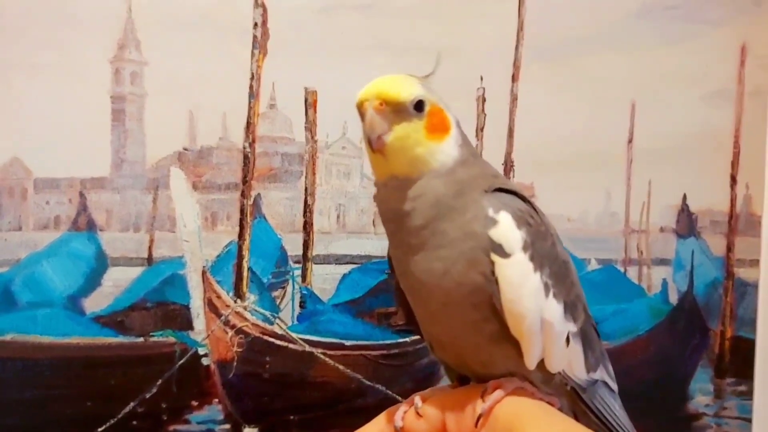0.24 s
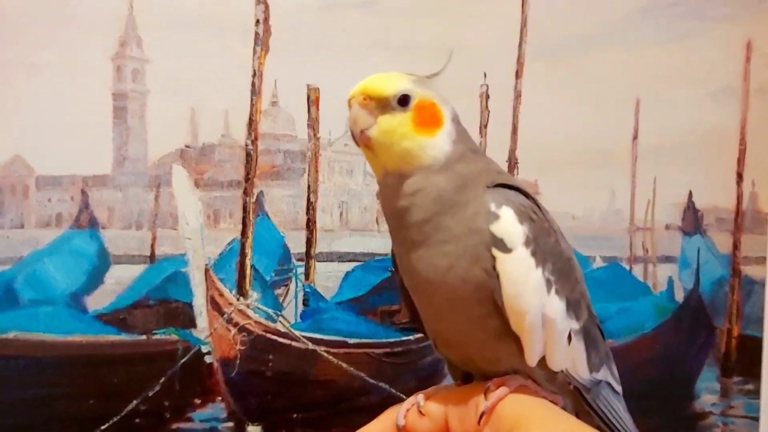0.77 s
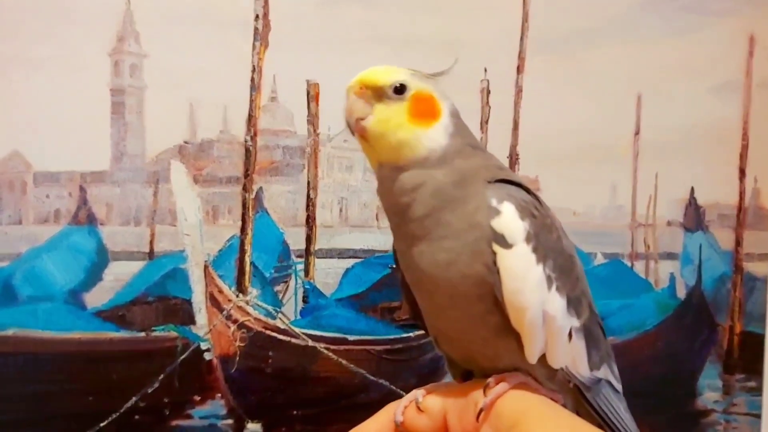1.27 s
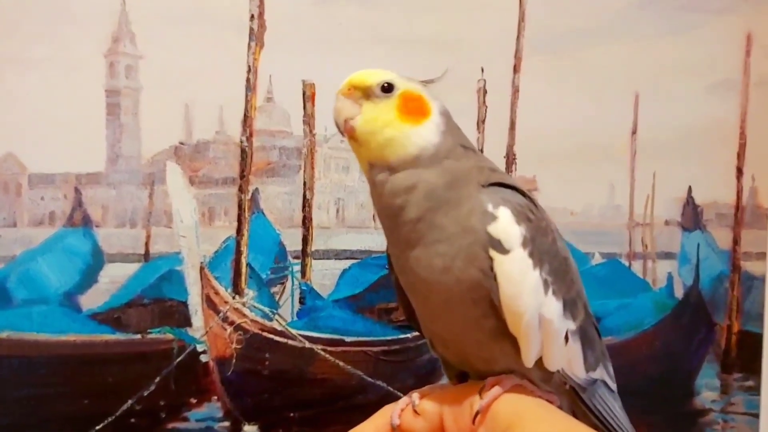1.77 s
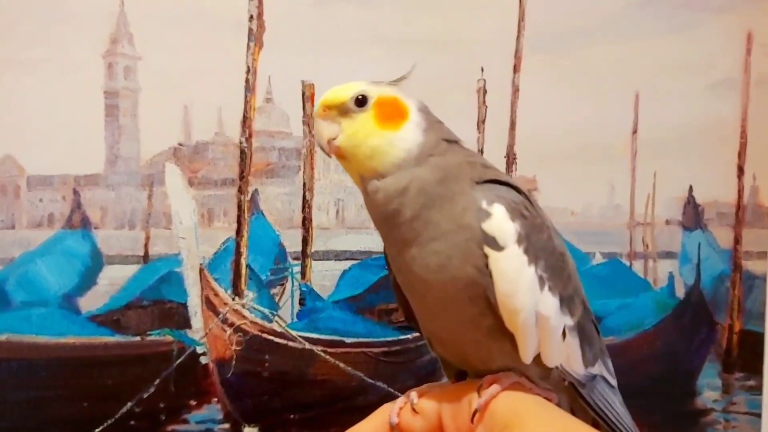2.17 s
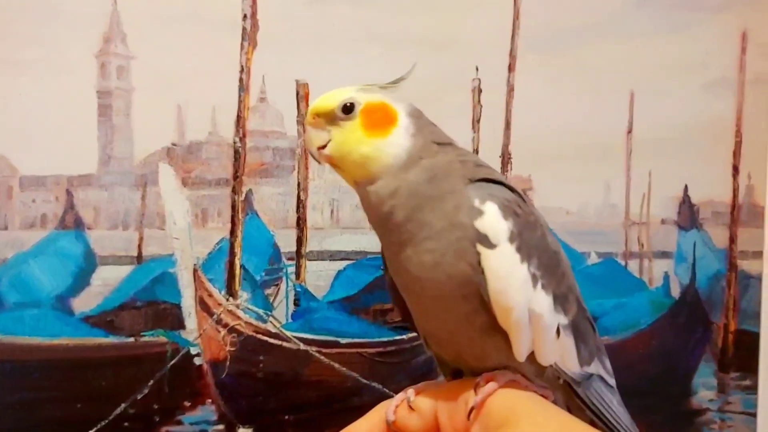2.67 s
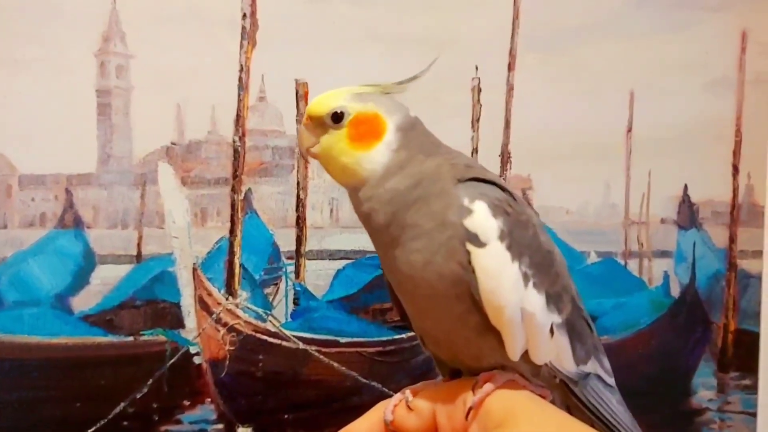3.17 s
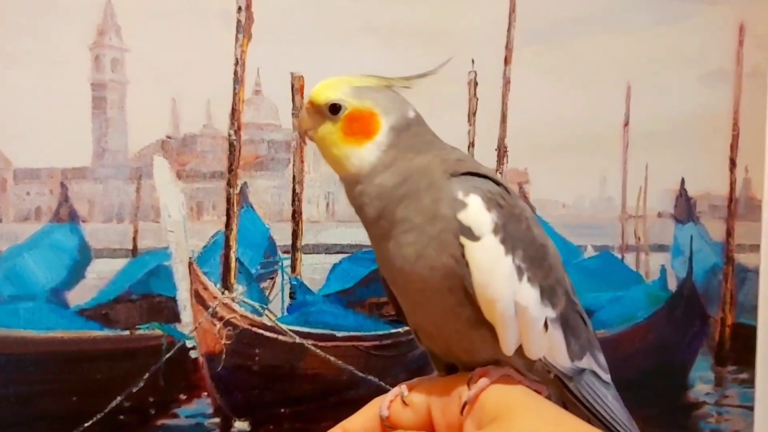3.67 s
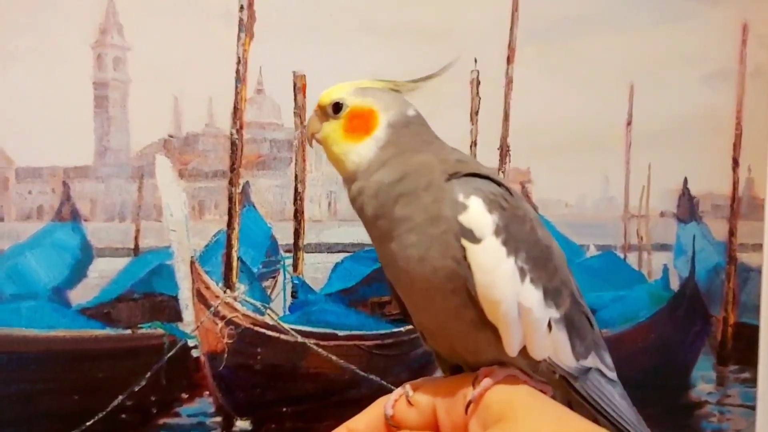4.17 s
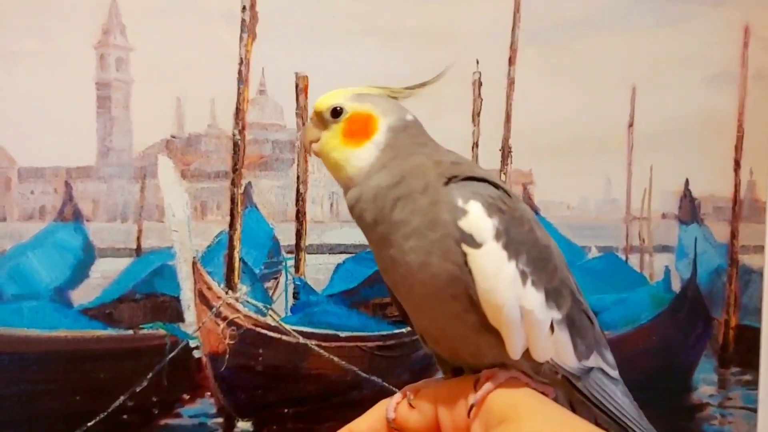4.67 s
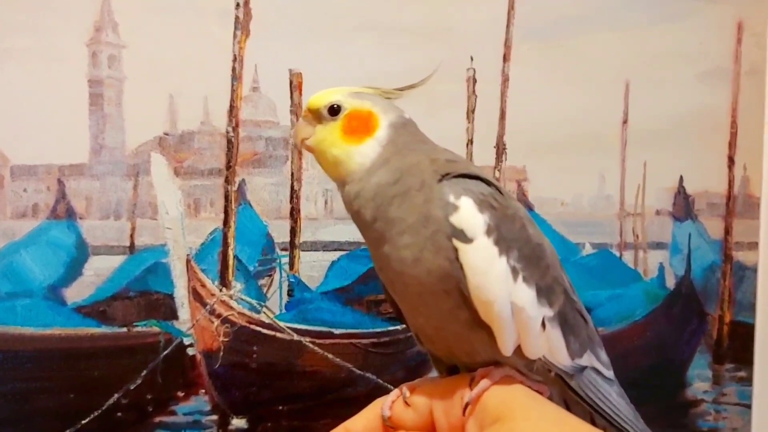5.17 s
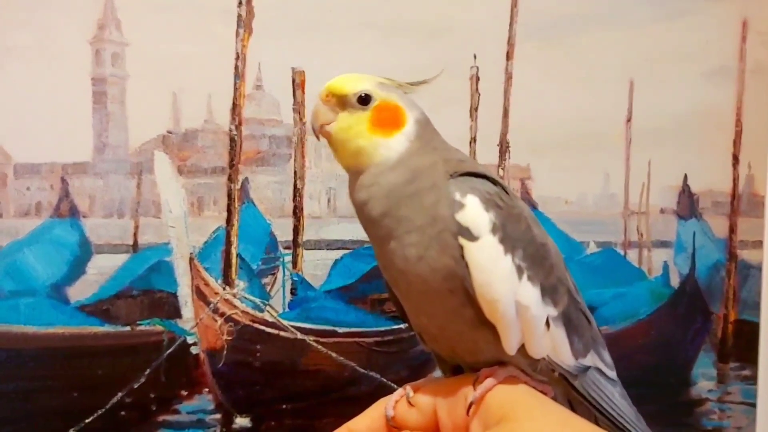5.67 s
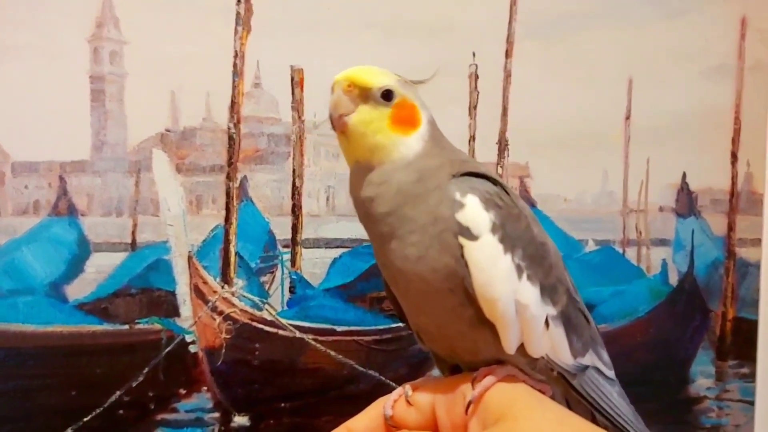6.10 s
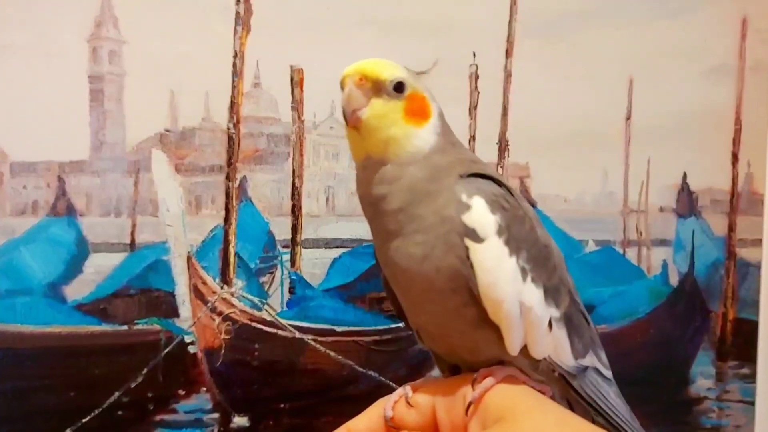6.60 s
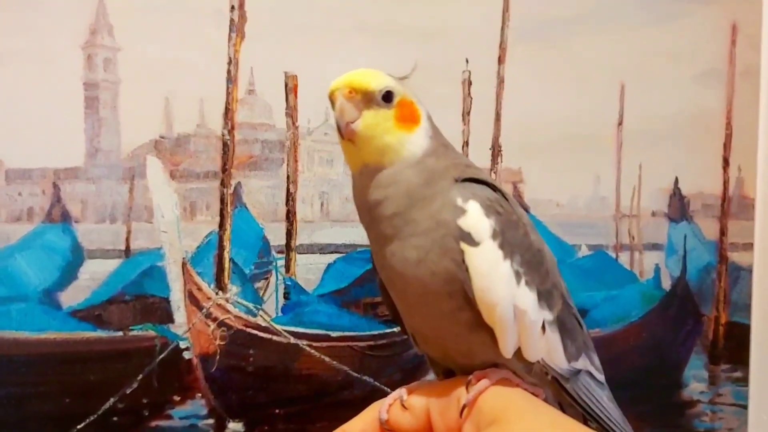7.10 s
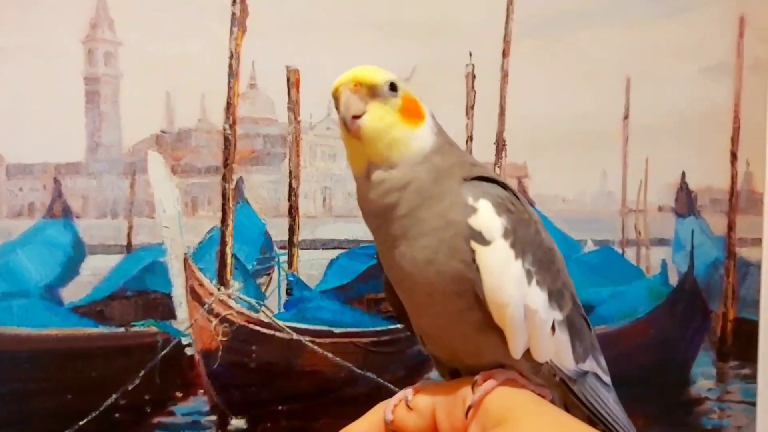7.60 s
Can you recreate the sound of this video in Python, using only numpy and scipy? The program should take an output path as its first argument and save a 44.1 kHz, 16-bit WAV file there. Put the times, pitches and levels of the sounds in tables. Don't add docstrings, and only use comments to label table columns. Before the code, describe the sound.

A pet cockatiel close by whistles three quick warbled notes, then repeats loud upward-breaking chirps at a steady pace in a ringing furnished room.

```python
import sys
import numpy as np
from scipy import signal
from scipy.fft import rfft, irfft, next_fast_len
from scipy.io import wavfile
from scipy.ndimage import uniform_filter1d, map_coordinates

SR = 44100
rng = np.random.default_rng(int(sys.argv[2]) if len(sys.argv) > 2 else 0)


def wrap_up_sound(samples):
    columns = np.atleast_2d(samples).T
    tamed = np.clip(columns, -1, 1)
    steps = np.round(tamed * 32767).astype(np.int16)
    wavfile.write(sys.argv[1], SR, steps)


def convert_level_to_amplitude(level_db):
    exponent = np.asarray(level_db, float) / 20
    return 10 ** exponent


N = 346185
LEAD = SR * 3 // 5
TIME = np.arange(-LEAD, N) / SR

# [t/s, level/dB]
HAND = [
    (0.0, -64),
    (1.2, -64.5),
    (1.5, -69),
    (3.4, -66.5),
    (5.5, -67),
    (6.36, -58.5),
    (7.34, -57),
    (7.85, -46.5),
]


def at_hz(points, hz):
    table_hz, value = np.array(points).T
    return np.interp(np.log(np.maximum(hz, 1)), np.log(table_hz), value)


def in_time(rows):
    return np.interp(TIME, *np.transpose(rows))


def white(*shape):
    return rng.standard_normal((*shape, len(TIME)))


def band_pass(x, low_hz, high_hz):
    return signal.sosfilt(signal.butter(2, [low_hz, high_hz], "band", fs=SR, output="sos"), x)


def drift(rate_hz):
    r = np.exp(-2 * np.pi * rate_hz / SR)
    slow = signal.lfilter([1], [1, -2 * r, r * r], white())
    return slow / slow.std()


def colour(x, points):
    size = next_fast_len(len(TIME))
    hz = np.arange(size // 2 + 1) * SR / size
    return irfft(rfft(x, size) * convert_level_to_amplitude(at_hz(points, hz)), size)[..., :len(TIME)]


def banded_noise(spectrum, patchy_db):
    # [f/Hz, correlation]
    likeness = [(60, .9), (290, .85), (640, .3), (3000, 0.0)]
    edges_hz = 18 * 2 ** np.arange(0, 10.1, .5)
    edges_hz = edges_hz[(edges_hz > spectrum[0][0] / 2) & (edges_hz < spectrum[-1][0] * 1.3)]
    source = white(2, 2)
    out = 0
    for k, (low_hz, high_hz) in enumerate(zip(edges_hz, edges_hz[1:])):
        centre_hz = np.sqrt(low_hz * high_hz)
        mid, side = band_pass(source[k % 2], low_hz, high_hz)
        alike = np.clip(at_hz(likeness, centre_hz), -1, 1)
        gain = convert_level_to_amplitude(at_hz(spectrum, centre_hz) + patchy_db * drift(5.7))
        out = out + gain * (np.sqrt(1 + alike) * mid + np.sqrt(1 - alike) * side * [[1], [-1]])
    return out / out.std()


def rumble():
    # [f/Hz, density/dB per Hz]
    spectrum = [(20, -21.5), (43, -27.5), (60, -0.5), (85, 2.5), (170, -5.5), (250, -0.5), (480, -17),
                (680, -30), (1000, -45), (2000, -57), (3300, -82.5)]
    port_db = np.array([[.8], [-.8]])
    return convert_level_to_amplitude(in_time(HAND) + port_db) * banded_noise(spectrum, patchy_db=1.6)


def hiss():
    # [f/Hz, density/dB per Hz]
    spectrum = [(300, 18.5), (1000, 18.5), (1750, 22.5), (2100, 5), (3500, -4), (8000, -0.5), (15000, -6)]
    return convert_level_to_amplitude(-79) * colour(white(2), spectrum)


def chirp(start_s, low_s, glide_s, top_s, top_db, low_db, low_hz, place, land_db, top_hz):
    onset_hz, settle_share, settle_s = 1265, .6, .013
    lift_s, lift_start_hz, lift_hz, lift_db = .027, 1243, 1426, 9.5
    jump_lead_s, jump_hz, jump_dip_db = .007, 1790, -2.5
    land_s, land_hz, land_hz_per_db = .007, 2150, 17.0
    shelf_share, shelf_hz, shelf_db = .4, 2110, -12.5
    climb, swell_db = .7, -3
    knee_hz, knee_db = 2716, .14
    top_share, sag_hz, sag_db = .62, 40.5, -10

    jump_s = start_s + low_s
    knee_s = jump_s + glide_s
    lowest_s = start_s + settle_s + np.clip(place, .05, .95) * (low_s - lift_s - settle_s)
    shelf_s = jump_s + shelf_share * glide_s
    return [(start_s, onset_hz, low_db),
            (start_s + settle_s, onset_hz + settle_share * (low_hz - onset_hz), low_db),
            (lowest_s, low_hz, low_db),
            (jump_s - lift_s, lift_start_hz, low_db),
            (jump_s - jump_lead_s, lift_hz, low_db + lift_db),
            (jump_s, jump_hz, low_db + lift_db + jump_dip_db),
            (jump_s + land_s, land_hz + land_hz_per_db * land_db, land_db),
            (shelf_s, shelf_hz, shelf_db),
            (shelf_s + climb * (knee_s - shelf_s), shelf_hz + climb * (knee_hz - shelf_hz), top_db + swell_db),
            (knee_s, knee_hz, top_db + knee_db),
            (knee_s + top_share * top_s, top_hz, top_db),
            (knee_s + top_s, top_hz - sag_hz, top_db + sag_db)]


def song_notes():
    # [t/s, pitch/Hz, level/dB]
    warble_1 = [(0.468, 1188, -41), (0.498, 1155, -31), (0.532, 1312, -22.5), (0.553, 1919, -19.5),
                (0.584, 1983, -8.5), (0.618, 2130, -12), (0.666, 1961, -13), (0.704, 2126, -9),
                (0.74, 2020, -11.5)]
    warble_2 = [(0.928, 2042, -22), (0.957, 2488, -4.5), (0.97, 2480, 1.3), (0.988, 2366, -5),
                (1.03, 2375, -16), (1.055, 1922, -17.5), (1.064, 2220, -15), (1.114, 2091, -6),
                (1.137, 2004, -21.5)]
    warble_3 = [(1.277, 1302, -27), (1.301, 1197, -27), (1.361, 1207, -27), (1.379, 1345, -22),
                (1.398, 1520, -27), (1.404, 1829, -16.5), (1.439, 2251, -11), (1.485, 2255, -9.5),
                (1.514, 2495, -13)]
    # [roughness/0-1, overtones/dB]
    warble_manner = [
        (.05, 2),
        (.05, 0),
        (0, 2.5),
    ]
    # [t/s, low tone/s, glide/s, top/s, top level/dB]
    chirps = [(1.709, .09, .064, .038, -2.5), (2.083, 0.089, 0.071, .032, -4),
              (2.474, 0.093, 0.09, 0.023, -5.5), (2.87, 0.11, 0.079, .016, -5.5),
              (3.291, .1, 0.069, .028, -6.5), (3.677, 0.11, 0.073, .037, -5), (4.091, 0.1, 0.082, .031, -4),
              (4.508, .109, 0.08, .026, -4.5), (4.93, 0.11, .076, .02, -3), (5.351, 0.11, 0.079, 0.032, -6),
              (5.842, 0.092, 0.072, .039, -2.5), (6.231, 0.095, 0.061, .036, -2),
              (6.65, .103, .058, .03, -3.5), (7.47, 0.089, 0.088, 0.039, -2.5)]
    # [level/dB, lowest pitch/Hz, place of lowest pitch/0-1]
    low_tones = [(-30, 1206, 0.8), (-28.5, 1177, 0.9), (-28.5, 1182, 0.1), (-29, 1175, 0.9),
                 (-29, 1167, 0.9), (-27.5, 1177, 0), (-27.5, 1111, 0.4), (-29, 1178, 1), (-29, 1142, 0.4),
                 (-29, 1144, 0.6), (-28.5, 1152, 0.6), (-28, 1195, 0), (-31, 1162, 0.8), (-33.5, 1171, 0.2)]
    # [landing level/dB, top pitch/Hz, closing roughness/0-1, overtones/dB]
    chirp_manner = [(-9.5, 2856, .05, -5.5), (-9.5, 2794, .05, -1.5), (-12.5, 2754, .05, -2.5),
                    (-17.5, 2773, 0.28, -1), (-14.5, 2807, 0.06, 0.2), (-19, 2822, 0.2, -1),
                    (-16, 2808, 0.02, -2), (-18, 2798, 0, -4.5), (-17.5, 2810, 0, -0.5),
                    (-17, 2831, .05, -1), (-14.5, 2924, 0.02, -5), (-10, 2830, 0.4, -3),
                    (-13, 2821, 0.5, -2), (-15.5, 2840, 0, -2)]
    notes = [warble_1, warble_2, warble_3]
    for timing, low, high in zip(chirps, low_tones, chirp_manner):
        notes.append(chirp(*timing, *low, *high[:2]))
    manners = warble_manner + [manner[2:] for manner in chirp_manner]
    closings = [(note[-1][0] - .005, *manner) for note, manner in zip(notes, manners)]
    return notes, closings


def bird():
    # [t/s, pitch/Hz, level/dB]
    earlier = [(-.5, 2332, -5), (-.42, 1950, -14), (-.38, 1705, -8.5), (-.34, 1550, -2.5), (-.3, 1300, -28)]
    # [t/s, length/s, roughness/0-1, swings per uneven group]
    steady_breaks = [(0.651, 0.022, 0.22, 4), (0.668, 0.007, 0.46, 4), (0.749, 0.023, 0.17, 4),
                     (0.936, 0.011, 0.29, 3), (1.03, 0.025, 1, 4), (1.061, 0.014, 0.3, 4),
                     (1.128, 0.019, 0.03, 2), (1.42, 0.021, 0.03, 3), (3.44, .01, 0.01, 3),
                     (3.815, 0.011, 0.37, 3)]
    # [multiple, low register/dB, high register/dB]
    overtones = [(2, -28.5, -32), (3, -53, -34), (4, -51, -43.5), (5, -62, -45), (6, -70.5, -54),
                 (7, -68, -67.5)]
    # [f/Hz, gain/dB]
    tract = [(1100, -19.5), (1800, 1), (2600, 5), (3600, 9.5), (5400, 1), (7000, -6), (9500, -5),
             (11500, 21.5), (13000, 23), (15000, 13)]
    # [f/Hz, width/Hz, roughness/0-1]
    register_break = (1650, 130, .3)
    attack_s, release_s = .0038, .012
    wander, jitter, break_spread = .007, .0038, .06
    effort, grain_rad = .031, .061
    half_tone_db, breath_db, air_db, wander_db = -35, -43.5, -70, 1.1

    notes, closings = song_notes()
    notes = [earlier] + notes
    s, pitch_hz, level_db = np.concatenate(notes).T
    corners_s = [(note[0][0], note[0][0] + attack_s, note[-1][0], note[-1][0] + release_s) for note in notes]
    gate = np.interp(TIME, np.ravel(corners_s), np.tile([0, 1, 1, 0], len(notes)))
    level_db = uniform_filter1d(np.interp(TIME, s, level_db), size=100)
    pitch_hz = uniform_filter1d(np.exp(np.interp(TIME, s, np.log(pitch_hz))), size=140)
    break_hz, width_hz, break_rough = register_break
    high = 1 / (1 + np.exp((break_hz - pitch_hz) / width_hz))

    breaks = steady_breaks + [(at_s, .02, amount, 3) for at_s, amount, _ in closings]
    spells = np.zeros((5, len(TIME)))
    for at_s, length_s, amount, group in breaks:
        near = slice(*np.searchsorted(TIME, [at_s - 2 * length_s, at_s + 2 * length_s]))
        spells[round(group), near] += amount * np.exp(-(2 * (TIME[near] - at_s) / length_s) ** 2)
    rough = sum(spells) + break_rough * 4 * high * (1 - high)

    unsteady = wander * (1 - .7 * high) * drift(40) + jitter * drift(89)
    pitch_hz = pitch_hz * (1 + unsteady + break_spread * rough * drift(270))
    phase = 2 * np.pi * np.cumsum(pitch_hz) / SR
    ends_s, _, bright_db = np.array(closings).T
    bright_db = bright_db[np.minimum(np.searchsorted(ends_s + .03, TIME), len(ends_s) - 1)]

    voice = np.sin(phase)
    for k, low_db, high_db in overtones:
        k = round(k)
        shape_db = at_hz(tract, k * pitch_hz) - at_hz(tract, pitch_hz)
        harder_db = high * (effort * k * (level_db + 16) + bright_db * (k / 4) ** 2)
        beads_db = (4 + 3 * high) * drift(70).clip(-3, 1)
        gain = convert_level_to_amplitude(low_db + (high_db - low_db) * high + shape_db + harder_db + beads_db)
        voice = voice + gain * (k * pitch_hz < 16500) * np.sin(k * (phase + grain_rad * drift(200)))
    half = convert_level_to_amplitude(half_tone_db - 24 * high + 7 * drift(25).clip(-3, 1))
    voice = voice + half * (np.sin(phase / 2) + .4 * np.sin(3 * phase / 2))
    uneven = sum(spells[group] * np.cos(phase / group) for group in range(2, 5))
    voice = voice * (1 + .4 * uneven + convert_level_to_amplitude(breath_db) * drift(900) + .14 * rough * drift(1200))
    voice = voice + convert_level_to_amplitude(air_db) * colour(white(), tract)
    swell = convert_level_to_amplitude(level_db + wander_db * (1.5 - high / 2) * drift(30))
    voice = np.sqrt(2) * swell * gate * voice
    return signal.sosfilt(signal.butter(4, 520, "high", fs=SR, output="sos"), voice)


def far_port(song):
    # [f/Hz, gain/dB]
    shading = [(600, -5.5), (1200, -7), (1900, -10.5), (2700, -10.5), (3800, -17), (5500, -14), (9000, -11),
               (13000, -3.5)]
    # [t/s, far port gain/dB, far port lag/ms]
    head = [(0, -0.5, 0.13), (1.2, 0.3, .115), (1.85, -.9, .11), (2.65, -1.9, 0.14), (3.05, 0.8, 0.16),
            (4.7, 0.8, 0.15), (5.1, 1, 0.14), (6.0, 0, 0.16), (6.4, -0.2, 0.14), (6.82, -2, .113),
            (7.65, -1.2, .123)]
    s, gain_db, lag_ms = np.transpose(head)
    late = np.arange(len(TIME)) - np.interp(TIME, s, lag_ms) * SR / 1000
    return convert_level_to_amplitude(np.interp(TIME, s, gain_db)) * map_coordinates(colour(song, shading), [late], order=3)


def room(song):
    # [f/Hz, t60/s, level/dB]
    room_bands = [(1000, 0.53, 1.5), (2400, 0.56, -1.67), (4000, 0.49, -12), (6800, 0.47, 3),
                  (13000, 0.48, 0.5)]
    # [near port/dB, far port/dB]
    room_db = (-13.5, -15.5)
    # [delay/s, near port/dB, far port/dB]
    reflections = [(.0011, -25, -36), (.0037, -38.5, -30), (.0083, -23, -17.5), (.013, -19.5, -26),
                   (.021, -25, -33.5)]
    first_echo_s, build_s = .007, .0022
    edges_hz = [300, 1700, 3300, 5000, 9500, 17000]
    t = np.arange(SR) / SR
    echoes = 0
    for (_, t60_s, level_db), low_hz, high_hz in zip(room_bands, edges_hz, edges_hz[1:]):
        band = band_pass(rng.standard_normal((2, SR)), low_hz, high_hz)
        echoes = echoes + band * convert_level_to_amplitude(level_db - 60 * t / t60_s)
    echoes = echoes * np.clip((t - first_echo_s) / build_s, 0, 1)
    echoes = echoes / np.sqrt(np.sum(echoes ** 2, axis=1, keepdims=True))
    echoes = convert_level_to_amplitude(np.array(room_db))[:, None] * echoes
    for delay_s, near_db, far_db in reflections:
        echoes[:, round(delay_s * SR)] += convert_level_to_amplitude(np.array([near_db, far_db]))
    return signal.fftconvolve(song[None], echoes, axes=1)[:, :len(song)]


def knocks():
    # [t/s, f/Hz, level/dB, length/s]
    touches = [(3.266, 166.5, -60, 0.099), (4.278, 49.03, -73, 0.054), (4.953, 75, -59, 0.11),
               (5.099, 60.5, -62, 0.029), (5.284, 63.7, -56, 0.14), (5.552, 74, -60, 0.1),
               (5.723, 62.4, -61, 0.23), (5.931, 398, -61.5, 0.18), (6.152, 375.3, -63.5, 0.33),
               (6.403, 70.8, -60.5, 0.066)]
    t = np.arange(SR // 2) / SR - .25
    out = np.zeros(len(TIME))
    for at_s, hz, level_db, length_s in touches:
        noise = band_pass(rng.standard_normal(len(t)), hz / 1.12, hz * 1.12)
        start = LEAD + round(at_s * SR) - SR // 4
        out[start:start + len(t)] += convert_level_to_amplitude(level_db) * noise / noise.std() * np.exp(-(2 * t / length_s) ** 2)
    return out


def rustle():
    # [f/Hz, density/dB per Hz]
    spectrum = [(300, -3.5), (1000, 8.5), (3500, -5.5), (7000, -2), (11000, 3), (15400, -5)]
    start_s, rise_s, quiet_db, below_rumble_db = 7.34, .15, -30, -5.0
    waiting = np.clip(1 - (TIME - start_s) / rise_s, 0, 1)
    level_db = in_time(HAND) + below_rumble_db + quiet_db * waiting
    return convert_level_to_amplitude(level_db) * banded_noise(spectrum, patchy_db=1.2)


def scene():
    song = bird()
    direct = np.array([song, far_port(song)])
    return (rumble() + hiss() + direct + room(song) + knocks() + rustle())[:, LEAD:]


def band_limit(x):
    return signal.sosfilt(signal.butter(12, 15560, fs=SR, output="sos"), x)


def record(dry):
    bent = dry + .0015 * dry ** 2
    mix = np.clip(bent, -.965, .955)
    return band_limit(mix)


dry = scene()
out = record(dry)
wrap_up_sound(out)
```